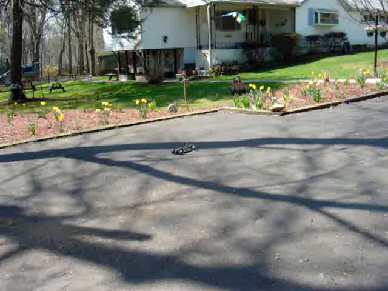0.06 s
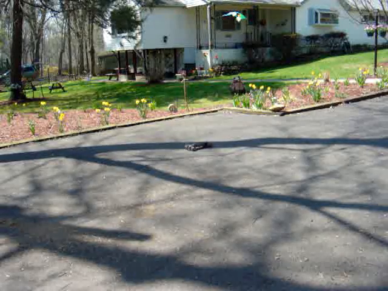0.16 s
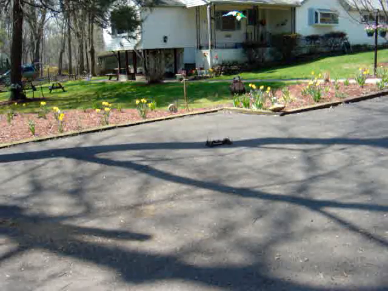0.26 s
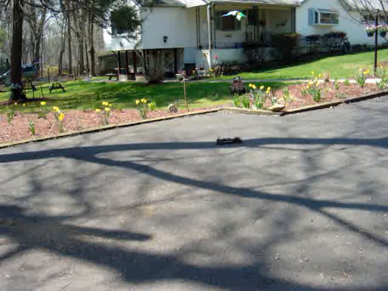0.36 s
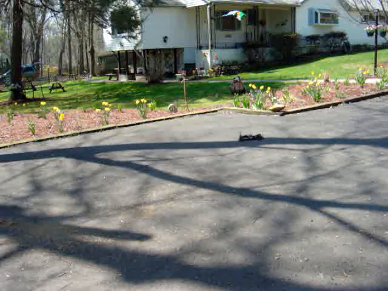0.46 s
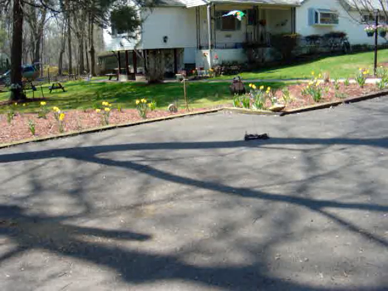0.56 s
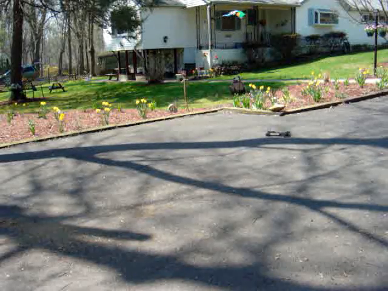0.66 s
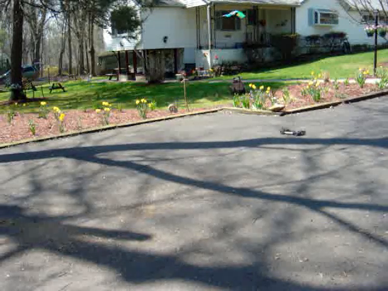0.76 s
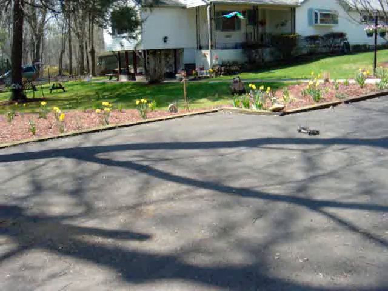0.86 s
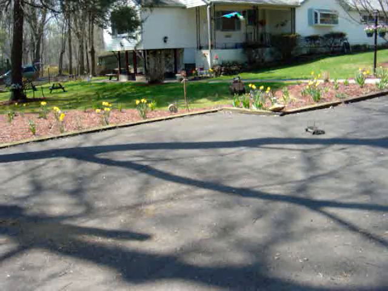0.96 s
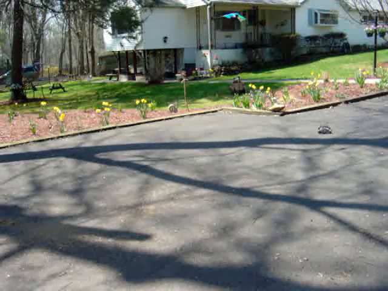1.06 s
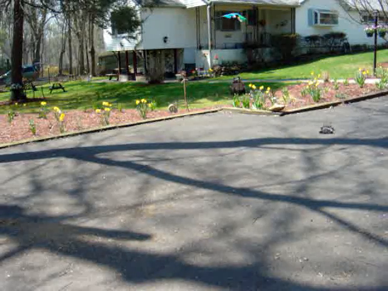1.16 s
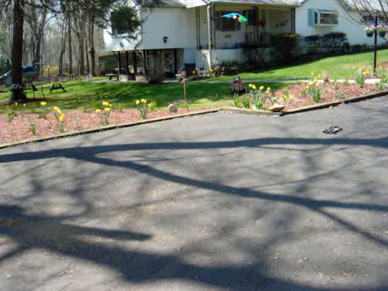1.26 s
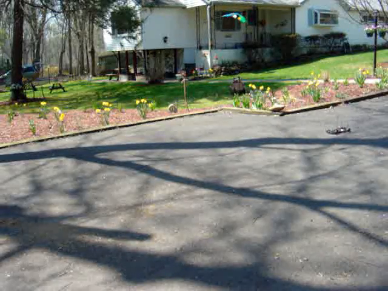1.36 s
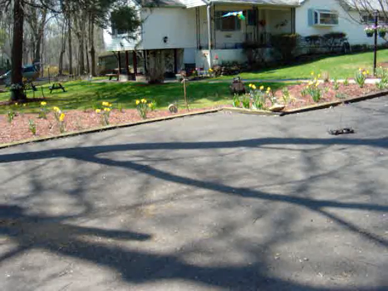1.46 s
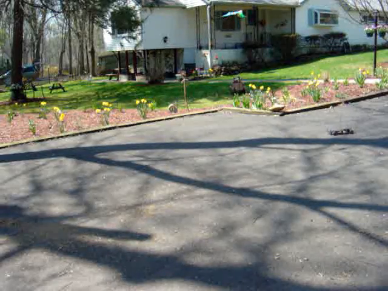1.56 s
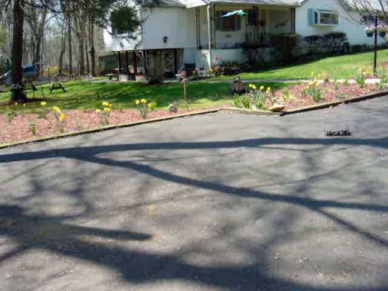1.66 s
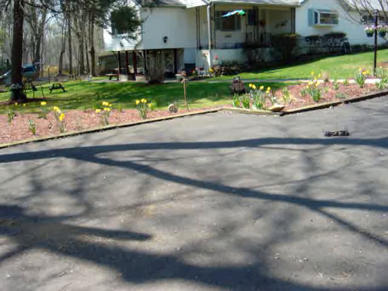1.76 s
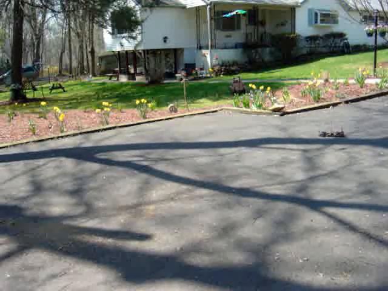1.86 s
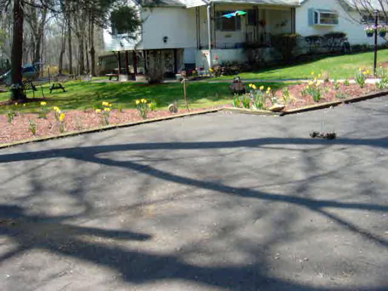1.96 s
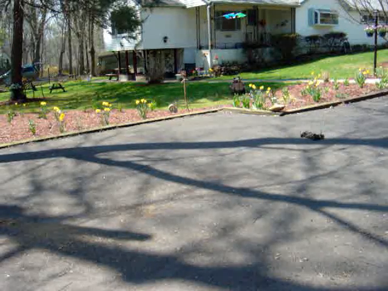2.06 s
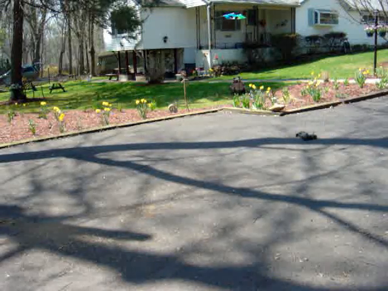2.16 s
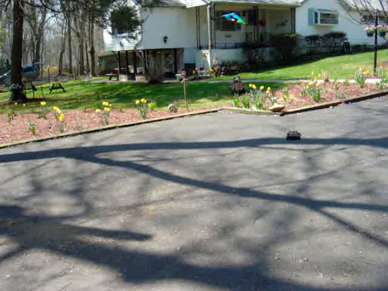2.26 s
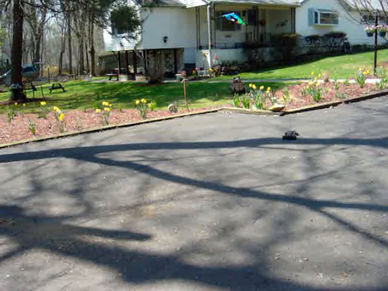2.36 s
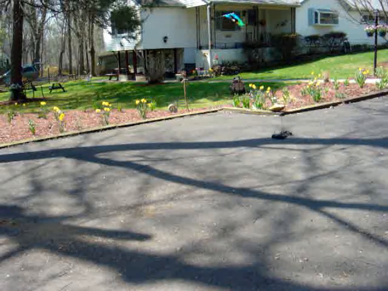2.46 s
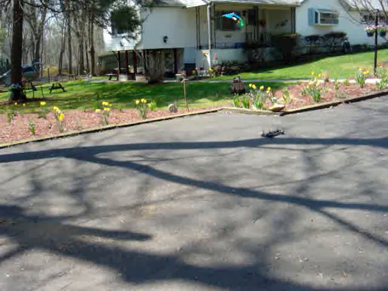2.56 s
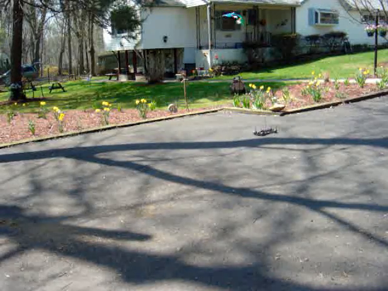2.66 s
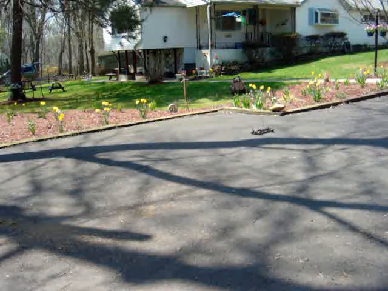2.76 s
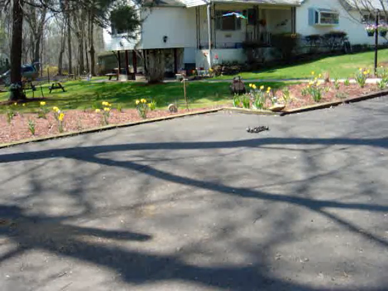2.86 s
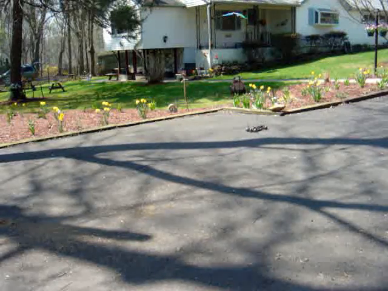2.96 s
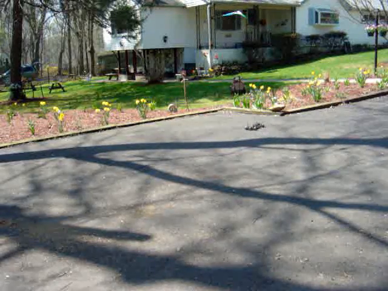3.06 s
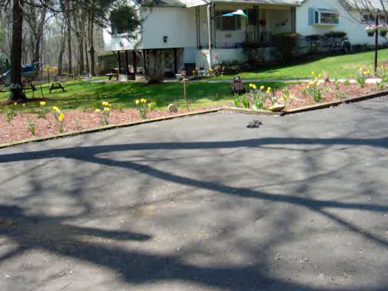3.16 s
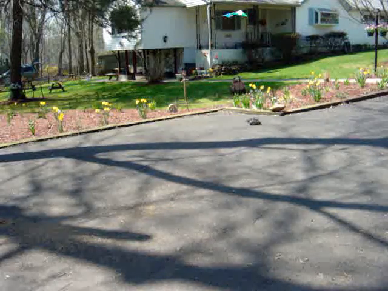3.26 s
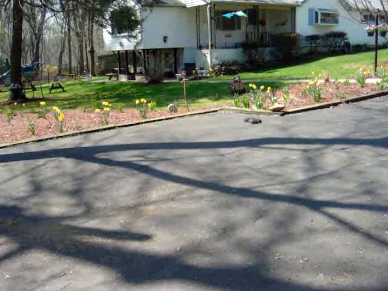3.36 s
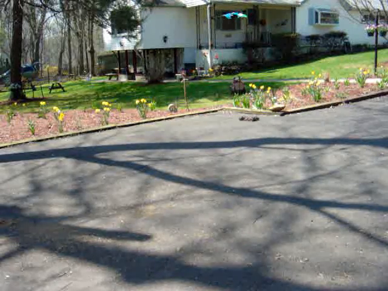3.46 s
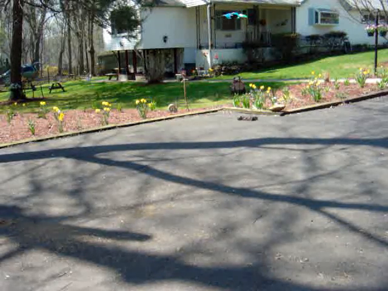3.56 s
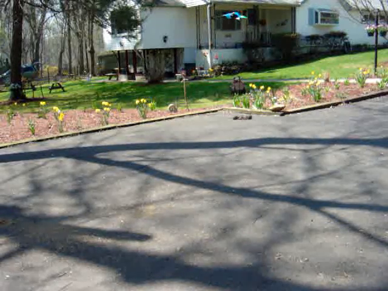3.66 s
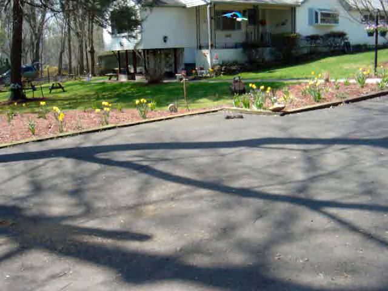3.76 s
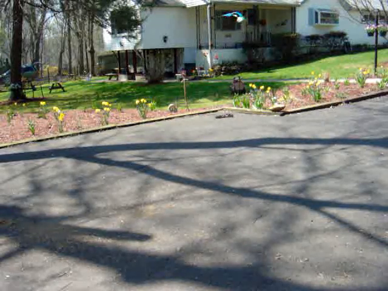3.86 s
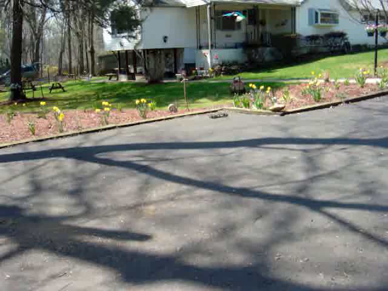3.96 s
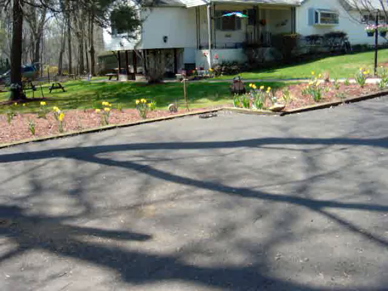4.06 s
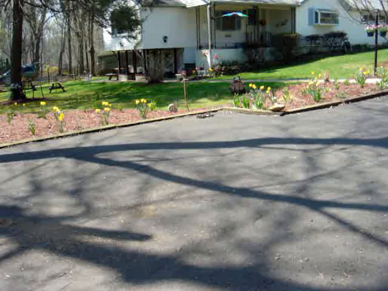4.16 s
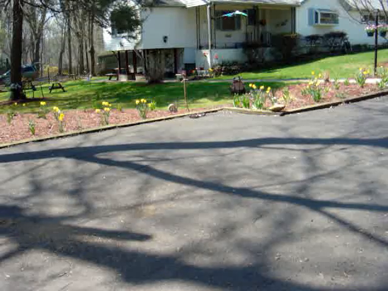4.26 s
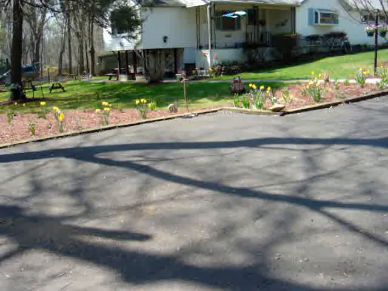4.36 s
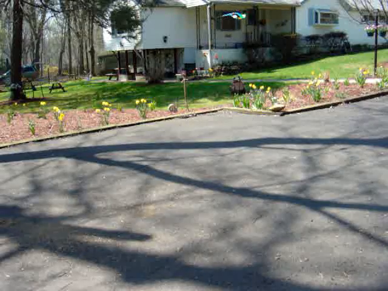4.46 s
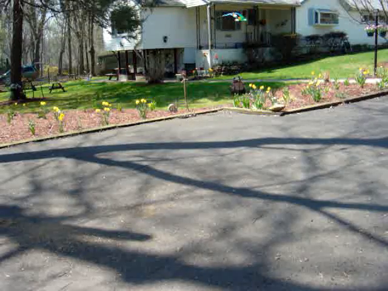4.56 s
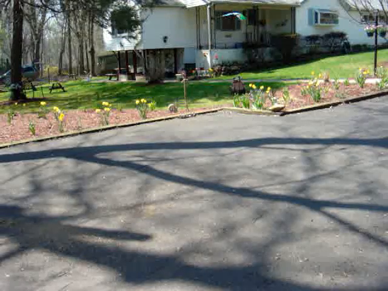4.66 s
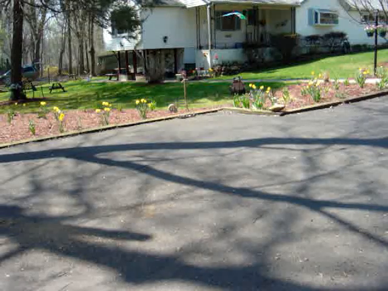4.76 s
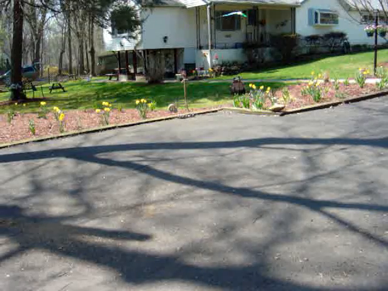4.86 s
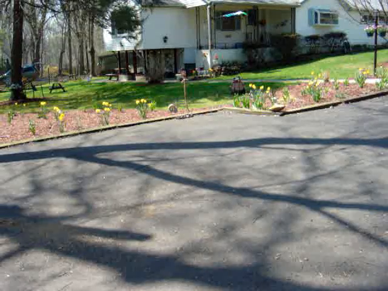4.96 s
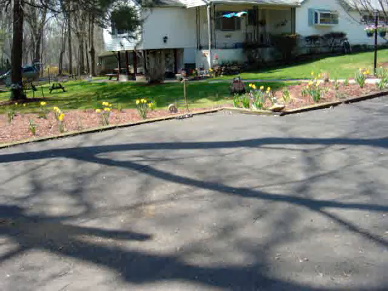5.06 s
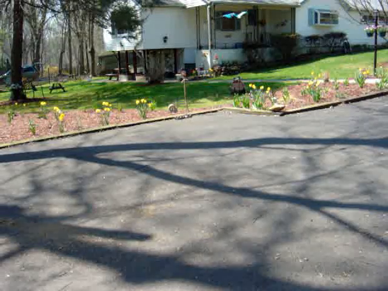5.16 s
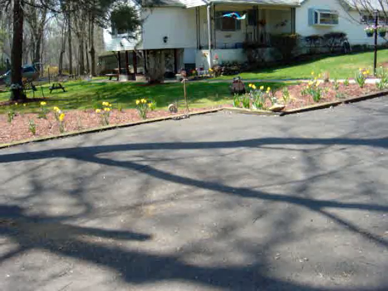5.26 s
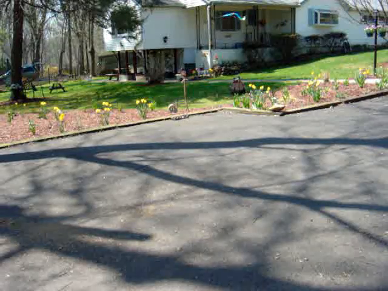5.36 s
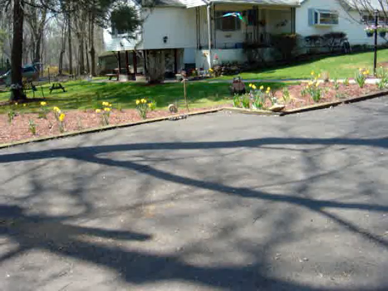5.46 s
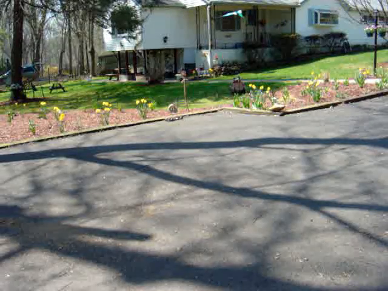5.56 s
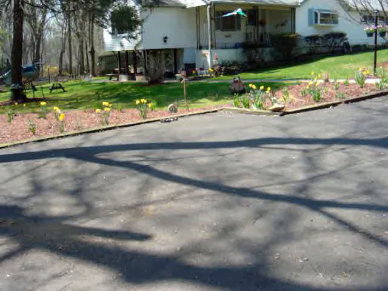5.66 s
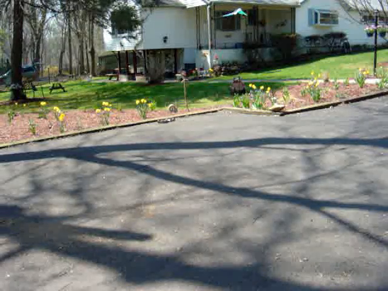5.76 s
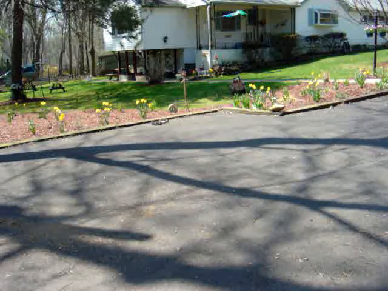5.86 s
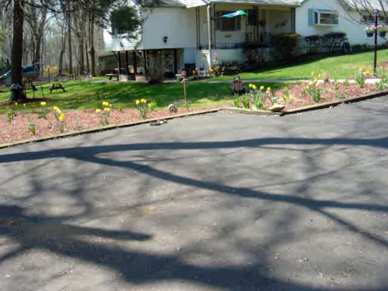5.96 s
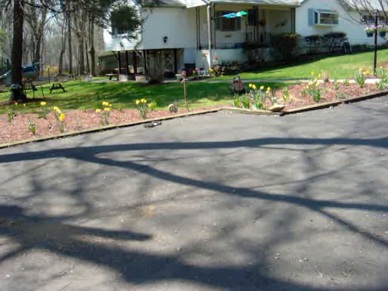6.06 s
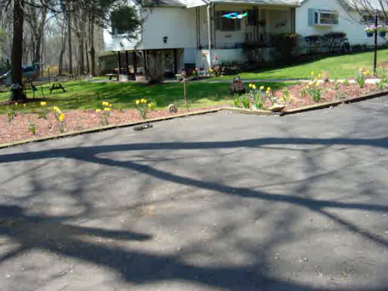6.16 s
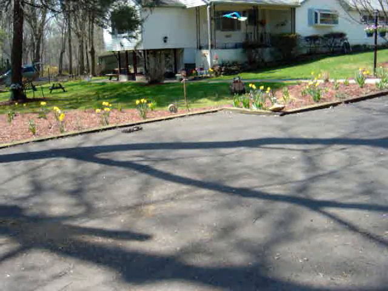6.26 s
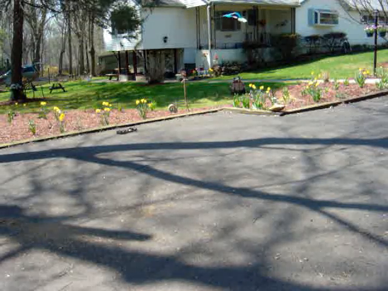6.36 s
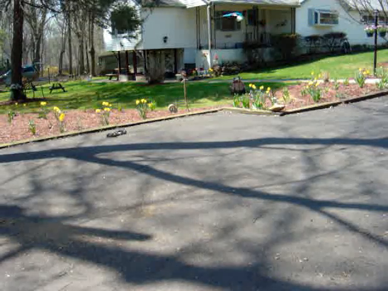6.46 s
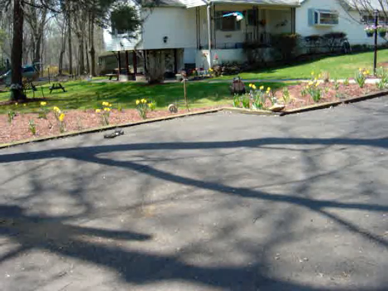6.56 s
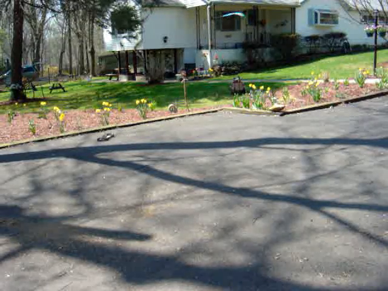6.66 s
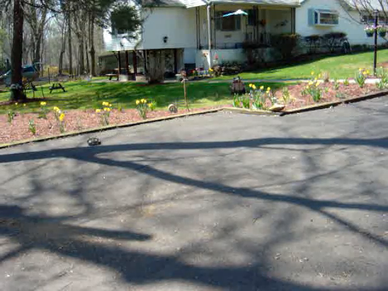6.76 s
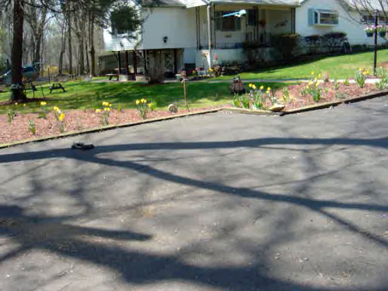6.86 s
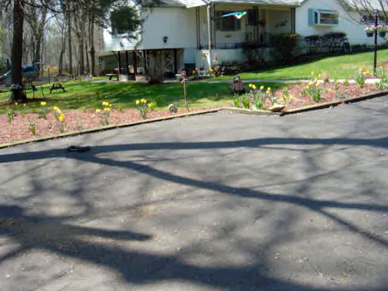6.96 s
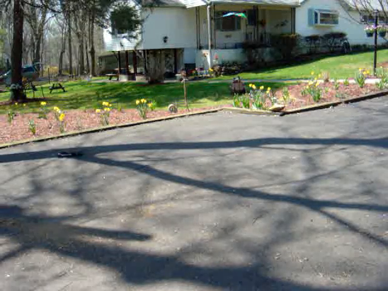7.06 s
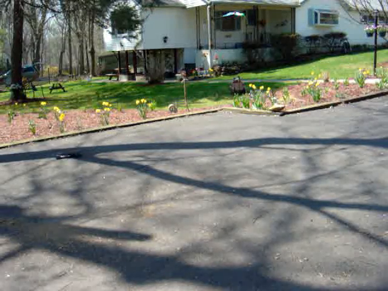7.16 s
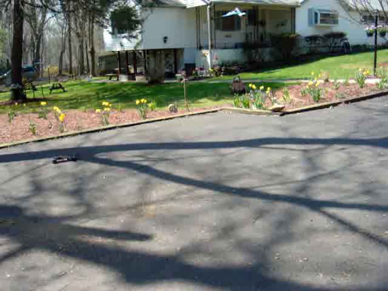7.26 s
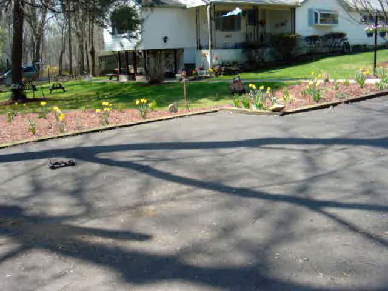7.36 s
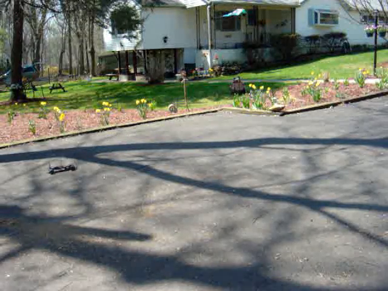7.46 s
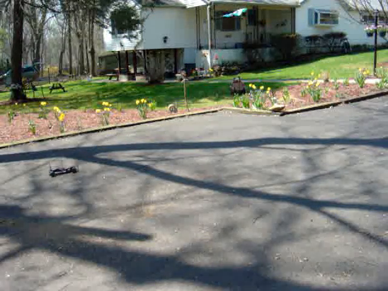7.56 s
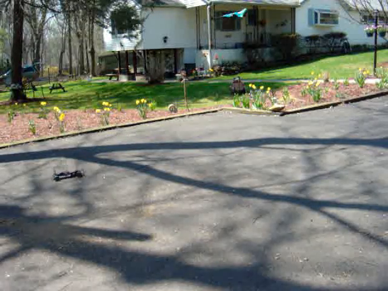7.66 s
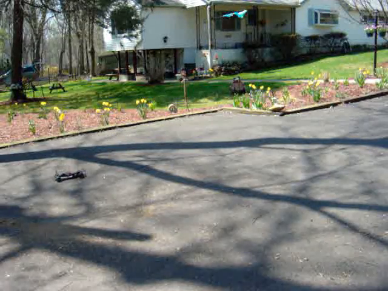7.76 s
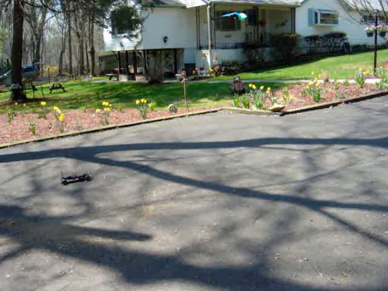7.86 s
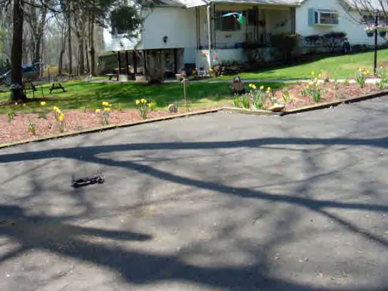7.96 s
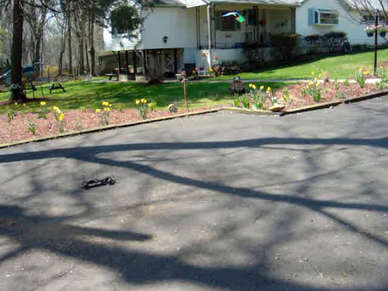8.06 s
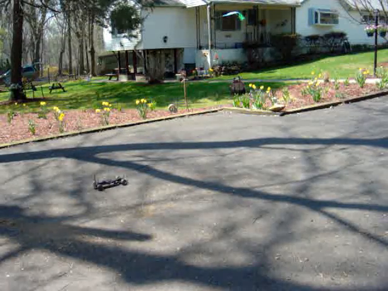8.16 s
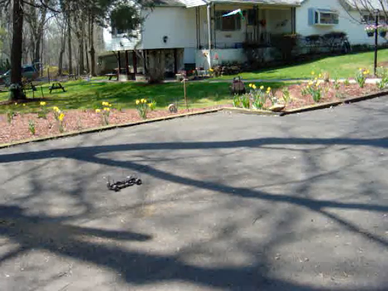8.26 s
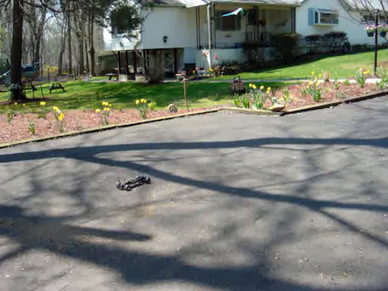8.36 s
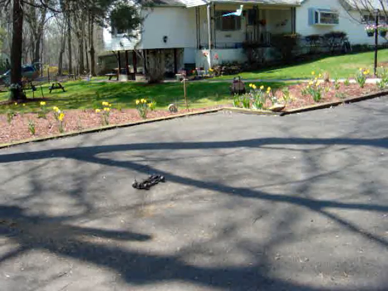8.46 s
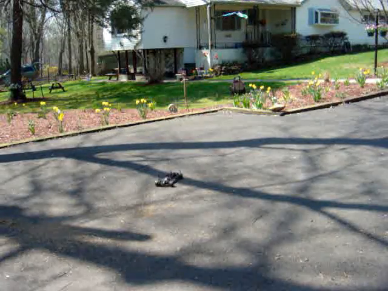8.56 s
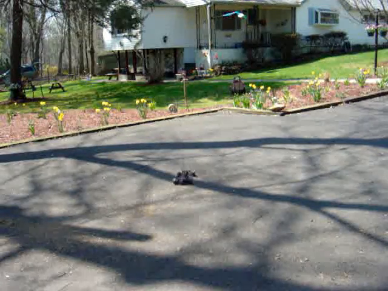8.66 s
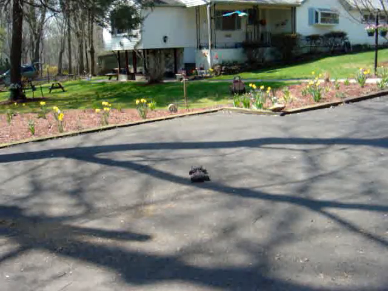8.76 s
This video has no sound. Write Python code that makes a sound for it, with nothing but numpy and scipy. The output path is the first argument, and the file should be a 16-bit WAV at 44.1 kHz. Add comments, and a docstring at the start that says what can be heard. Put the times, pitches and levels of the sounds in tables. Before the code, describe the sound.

A small electric remote-controlled car runs on an asphalt driveway throughout, with a high, raspy gear whine, a rattling chassis and the rumble and scrape of hard tyres. In the first three seconds the whine swoops quickly up and down with the throttle. Thin tyre squeals come around 0.5 to 1.2 seconds and again from 2.5 to 3.3, and sharp plastic clacks mark bumps near 0.9, 1.8 and 2.7 seconds. From about 3.5 seconds the car revs in short blips with more clacks, nearly stopping around 4.7 and 5.1, then runs low and quieter until 6.6. It surges near 6.8 seconds with a squeal, then holds a fast, high whine from 7.3 to the end near 8.8, the tyres squealing in a long slide. Irregular gusts thump the microphone over a low garden hush, and the car has a faint, short outdoor echo.

```python
"""Model car drifting on a driveway

A small electric model car slides round on asphalt. Its gears whine up and down with the throttle
and rattle the chassis. Its hard plastic tyres rumble, scrape and squeal, and bumps make it clack.
Gusts of wind thump the microphone over a quiet garden."""
import sys
import numpy as np
from scipy import signal
from scipy.fft import rfft, irfft
from scipy.io import wavfile
from scipy.ndimage import map_coordinates

SR = 44100
rng = np.random.default_rng(int(sys.argv[2]) if len(sys.argv) > 2 else 0)


def transcribe(u):
    """Save the signal u as a 16-bit wav file named by the first command-line argument.

    u: samples, shape (n,) or (channels, n), limited to [-1, 1]; the rate is SR.
    q: integer samples, one column per channel.
    """
    v = np.clip(np.atleast_2d(u).T, -1, 1)
    q = np.round(v * 32767).astype(np.int16)
    wavfile.write(sys.argv[1], SR, q)


N = 387638
TIME = np.arange(N) / SR
FREQS = np.fft.rfftfreq(N, 1 / SR)

# The motor's peaks and dips as the throttle is worked.
# Each row: time in seconds, tooth rate in Hz (how many gear teeth meet each second).
MOTOR_SPEEDS = [(0.0, 7550), (0.1, 8380), (0.386, 2242), (0.692, 5970), (0.825, 1867), (1.13, 954),
                (1.38, 5167), (1.54, 1643), (1.932, 6070), (2.239, 5160), (2.724, 3450), (3.059, 7250),
                (3.23, 1368), (3.299, 1455), (3.503, 5270), (3.644, 1405), (3.916, 6930), (4.071, 1388),
                (4.222, 3840), (4.37, 1354), (4.738, 470), (4.946, 4110), (5.065, 407.5), (5.225, 450),
                (5.49, 4910), (5.61, 941), (5.705, 880), (5.86, 1428), (5.919, 1459), (5.975, 2020),
                (6.019, 1705), (6.33, 1580), (6.613, 1710), (6.871, 7710), (7.042, 2525), (7.26, 4510),
                (7.531, 6440), (8.229, 6270), (8.374, 6780), (8.551, 4850), (8.71, 6950)]
# How loud the car would be at full speed as it circles and turns.
# Each row: time in seconds, then the levels of whine, rolling, rattle and scrape in dB.
CAR_LEVELS = [(0.0, -16, -26.5, -22.5, -19.5), (0.45, -19.5, -25.5, -22.5, -21),
              (0.8, -25, -24.5, -23.5, -18.5), (1.1, -27, -27.5, -20, -13),
              (1.55, -20.0, -31.5, -23.0, -20), (2.3, -20.5, -30.5, -22, -18.5),
              (3.05, -21.0, -29, -22.0, -18.5), (3.35, -28, -31.5, -22.5, -22),
              (3.9, -23.5, -31.5, -24.5, -22.5), (4.5, -28.5, -34, -23, -20.5),
              (4.9, -24, -33.5, -24.5, -20), (5.45, -24, -34.5, -24.5, -22.5),
              (5.75, -25.5, -33.5, -29.5, -30), (6.45, -27.5, -32, -25.5, -25), (6.8, -18, -28.5, -23, -22),
              (7.1, -21.5, -29.0, -22, -18.5), (7.6, -24.0, -26.5, -24.5, -17.5),
              (8.79, -17.5, -26.5, -22.5, -18.5)]
# The whine flares at pitches where the gearbox rings. Each row: frequency in Hz, gain in dB.
GEARBOX_TONE = [(500, -29), (900, -24), (1400, -20), (1900, -11), (2500, -8.5), (3200, 0.5), (3700, -2),
                (4200, -8), (5000, -11.5), (5900, -14.5), (6750, -4.5), (7400, -8.5), (8300, -17),
                (16000, -30)]
# The gears bite hard and the whine flares; one row is a dip instead.
# Each row: middle time in seconds, half length in seconds, level change in dB.
GEAR_BITES = [(0.289, 0.014, 6), (0.506, 0.015, 5.5), (1.26, 0.02, 3), (1.456, 0.017, 7),
              (2.158, 0.15, 2.5), (3.748, 0.014, 7), (3.89, 0.036, 7), (4.144, 0.012, 6), (5.36, 0.03, 4),
              (5.55, 0.014, 8), (5.976, 0.016, 8), (6.62, 0.013, -3), (7.12, 0.016, 10), (7.19, 0.04, 7)]
# The tone of the chassis, rolling tyres and scraping tyres. Each row: frequency in Hz, level in dB.
CHASSIS_TONE = [(900, -29), (1700, -11.5), (2200, -3.5), (2650, 2.5), (3100, 7.5), (3450, 0.5),
                (3900, -3.5), (4400, -4), (4900, -1.5), (5700, -4.5), (7500, -21.5), (12000, -20)]
ROLL_TONE = [(200, -7.5), (450, -6.5), (750, 1.5), (1150, 0), (1480, 2.5), (1900, 3), (2600, 5),
             (5000, -10)]
SCRAPE_TONE = [(1500, -21.5), (3500, -1.5), (5000, 1), (6500, 2), (7600, 4.5), (8500, 5), (9200, 2.5),
               (9700, 4.5), (12000, 3.5), (16000, -11.5)]
# Tyre squeals. Each row: start and end in seconds, pitch in Hz, spread of pitch in Hz, level in dB.
TYRE_SQUEALS = [(0.542, 0.771, 7130, 220, -36), (0.847, 0.988, 4890, 260, -28.5),
                (1.103, 1.198, 4810, 267, -34.5), (2.483, 2.753, 4840, 218, -31.5),
                (2.974, 3.129, 4850, 305, -32), (3.11, 3.344, 4845, 298, -31.5),
                (6.745, 6.957, 5000, 297, -27), (7.233, 8.274, 7410, 418, -30.5),
                (8.188, 8.79, 4680, 221, -32)]
# Knocks over bumps. Each row: time in seconds, clack level in dB, then the levels of bright grit
# and dull clunk in dB compared with the clack.
BUMPS = [(0.178, -22, -11, -24), (0.83, -15, -17, -17), (0.8733, -12.5, -8, -21), (1.1388, -16.5, -9, -16),
         (1.7537, -11.5, -18, -28), (1.815, -10, -20, -31), (2.6635, -15, 2, -24), (3.6341, -18, 2, -28),
         (3.7115, -27, -17, -26), (3.8195, -24, -14, 2), (4.1742, -15, -11, -28), (4.3485, -17, -6, -11),
         (4.407, -15.5, -4.5, -22), (4.645, -25, -20, -18), (5.22, -28, -5, -14), (6.6211, -20, -3, -4)]
# Thin whistles beside the whine. Each row: start and end in seconds, pitch in Hz, level in dB.
THIN_WHISTLES = [(1.2, 2.3, 1007, -45), (5, 5.21, 2406, -50), (-0.05, 0.18, 930, -40)]
# The car's echo off a hard surface nearby. Each row: time in seconds, echo delay in seconds.
ECHO_DELAYS = [(0, .00552), (.7, .00535), (1.2, .0051), (1.7, .005), (2.7, .00528), (4.7, .0056),
               (6.7, .00562), (8.2, .00546), (8.79, .0054)]
# Gusts at the microphone. Each row: start in seconds, length in seconds, level in dB.
WIND_GUSTS = [(0.153, 0.04, -33), (0.528, 0.088, -20.5), (0.818, 0.024, -25), (0.892, 0.022, -24),
              (1.199, 0.037, -36), (1.29, 0.18, -34), (1.345, 0.062, -27.5), (1.512, 0.15, -25.5),
              (1.775, 0.2, -23), (2.947, 0.036, -32.5), (3.578, 0.33, -34.5), (5.141, 0.097, -30.5),
              (5.321, 0.3, -31.5), (5.602, 0.12, -25.5), (5.781, 0.32, -24), (6.601, 0.051, -26),
              (6.708, 0.03, -24.5), (7.06, 0.031, -27), (7.17, 0.3, -29), (7.572, 0.12, -28.5),
              (7.841, 0.42, -36), (8.484, 0.12, -25.5), (8.61, 0.18, -33)]
# The tone of a hard gust, a light breeze and the garden. Each row: frequency in Hz, level in dB.
GUST_TONE = [(15, -50), (30, -24), (45, -11), (70, -6), (110, 2), (170, 2), (260, -4), (340, -11.5),
             (450, -13.5), (650, -36), (1200, -70)]
BREEZE_TONE = [(15, -45), (30, -18), (45, -9), (70, 0.5), (120, 2), (180, -7.5), (280, -11), (500, -26),
               (1200, -70)]
GARDEN_TONE = [(20, -8), (60, 0.5), (110, -4.5), (200, -3), (500, 0.5), (900, -7.5), (1400, -12),
               (2200, -40), (4000, -16), (8000, -70), (16000, -23)]


def motor_speed():
    """The tooth rate in Hz: the motor's inertia eases it from each peak or dip to the next."""
    times, hz = np.transpose(MOTOR_SPEEDS)
    rows = np.arange(len(times))
    place = np.interp(TIME, times, rows)
    eased = np.floor(place) + (1 - np.cos(np.pi * (place % 1))) / 2
    return np.interp(eased, rows, hz)


def spur_gear(tooth_hz, teeth=88):
    """A slightly uneven wave with one cycle for each turn of the big spur gear."""
    uneven_hz = tooth_hz * (1 + 0.0817 * wander(39))
    return np.sin(2 * np.pi * np.cumsum(uneven_hz) / teeth / SR)


def gear_whine(tooth_hz, load, level_db, spur, teeth_per_shake=9, clash_below_hz=1830):
    """Meeting teeth sing a raspy note; the slack between them shakes it, more so at speed."""
    teeth = np.cumsum(tooth_hz * (1 + .017 * wander(89.3))) / SR
    fray = np.clip(tooth_hz / 3800, .8, 1.6)
    shakes = rng.standard_normal((2, int(teeth[-1] / teeth_per_shake) + 2))
    along, across = (map_coordinates(shake, [teeth / teeth_per_shake], order=3, mode="nearest")
                     for shake in shakes)
    # a complex number lets the slack shake both the strength and the timing of the note
    slack = (1 + fray * (along + 1j * across)) / np.sqrt(1 + 2 * fray ** 2)
    # the gears tighten once a turn of the spur gear; the force jumps as the tyres catch and let go
    force = slack * unit((1 + .38 * spur) * flutter(hz=70, depth_db=2))
    force = force / np.hypot(1, abs(force) / 1.9)  # plastic teeth give way under the hardest blows
    note, octave, third_harmonic = (
        unit((force * np.exp(2j * np.pi * k * teeth)).real) * gain_at(GEARBOX_TONE, k * tooth_hz)
        for k in (1, 2, 3))
    # slow teeth with no load clash on both sides and sing their overtones
    slow = .5 + .5 * np.tanh((clash_below_hz - tooth_hz) / 250)
    clash = slow * (1 - abs(load)) * speed_gain(tooth_hz, knee_hz=1100, power=3.2)
    overtones = amp(-2) * octave + amp(-13) * third_harmonic
    return amp(level_db) * (note + amp(-20) * octave + clash * overtones)


def chassis_rattle(tooth_hz, level_db, spur):
    """Loose shafts and teeth chatter into the chassis and its thin shell."""
    chatter = grains(per_s=9000, spread_db=3) * (1 + 0.047 * spur) * flutter(hz=93.5, depth_db=2.5)
    return amp(level_db) * speed_gain(tooth_hz, knee_hz=1080, power=3.44) * colour(chatter, CHASSIS_TONE)


def tyre_roll(tooth_hz, level_db):
    """Hard tyres rumble over the stones."""
    rumble = colour(grains(per_s=4600, spread_db=2.0), ROLL_TONE)
    return amp(level_db) * speed_gain(tooth_hz, knee_hz=1030, power=1.0) * rumble


def tyre_scrape(tooth_hz, level_db):
    """Spinning tyres rasp; each patch of asphalt has its own tone, so each band of pitch flickers."""
    grit = rfft(colour(grains(per_s=14000, spread_db=4.5), SCRAPE_TONE))
    centres = np.linspace(0, SR / 2, num=14)
    bands = (irfft(grit * np.clip(1 - abs(FREQS - hz) / centres[1], 0, 1), N) for hz in centres)
    rasp = unit(sum(band * flutter(hz=73.4, depth_db=1.9) for band in bands))
    rasp *= flutter(hz=114, depth_db=2.5)
    slip = speed_gain(tooth_hz, knee_hz=6380, power=0.83)
    slip *= speed_gain(tooth_hz, knee_hz=640, power=3.4)  # at a crawl the tyres grip and hardly scrape
    return amp(level_db) * slip * rasp


def tyre_squeals():
    """A tyre sticks and slips, making a fuzzy ring around one pitch."""
    out = np.zeros(N)
    for start, end, hz, width, db in TYRE_SQUEALS:
        ring = irfft(rfft(rng.standard_normal(N)) / (1 + ((FREQS - hz) / width) ** 2), N)
        out += amp(db) * gate(start, end) * unit(ring)
    return out


def bump_knocks(rise_s=0.00086, decay_s=0.0073):
    """Each bump gives a short clack of plastic, a spit of grit and a clunk of the wheels."""
    clack, grit, clunk = (colour(rng.standard_normal(N), tone)
                          for tone in (CHASSIS_TONE, SCRAPE_TONE, ROLL_TONE))
    out = np.zeros(N)
    for start, db, grit_db, clunk_db in BUMPS:
        age = TIME - start
        blow = amp(db) * np.clip(age / rise_s, 0, 1) * np.exp(-abs(age) / decay_s)
        out += blow * (clack + amp(grit_db) * grit + amp(clunk_db) * clunk)
    return out


def whistles():
    """Faint, almost steady tones."""
    wavering_time = np.cumsum(1 + 0.0041 * wander(33)) / SR
    return sum(amp(db) * gate(start, end) * np.sqrt(2) * np.sin(2 * np.pi * hz * wavering_time)
               for start, end, hz, db in THIN_WHISTLES)


def near_echo(sound, strength=.3):
    """A quick echo lifts some pitches and weakens others; the pattern slides as the car moves."""
    delay, = curves(ECHO_DELAYS)
    echo = np.interp(TIME - delay, TIME, sound)
    return (sound + strength * echo) / np.hypot(1, strength)


def yard_echoes(sound, fade_s=.35, level_db=-17):
    """The house and trees scatter the sound into a faint, short tail."""
    t = np.arange(SR // 2) / SR
    echoes = rng.standard_normal(len(t)) * (rng.random(len(t)) < .05)
    tail = echoes * (t > .02) * amp(-60 * t / fade_s)
    return sound + amp(level_db) * signal.fftconvolve(sound, tail / np.linalg.norm(tail))[:N]


def wind(breeze_db=-42.5, hard_db=-33, rise_s=0.0081, fall_s=0.016):
    """Swirls of air thump the microphone: a breeze is a dull rumble, a hard gust is higher in pitch."""
    power = (amp(breeze_db) * flutter(hz=4, depth_db=2.5)) ** 2
    for start, length, db in WIND_GUSTS:
        before = np.maximum(start - TIME, 0)
        after = np.maximum(TIME - start - length, 0)
        power += (amp(db) * np.exp(-(before / rise_s) ** 2 - (after / fall_s) ** 2)) ** 2
    wind_db = 10 * np.log10(power)
    swirls = rng.standard_normal(N) * flutter(hz=52, depth_db=5.0)
    hard = .5 + .5 * np.tanh((wind_db - hard_db) / 6)
    return amp(wind_db) * ((1 - hard) * colour(swirls, BREEZE_TONE) + hard * colour(swirls, GUST_TONE))


def garden(level_db=-40.5):
    """The low, steady hush of the garden."""
    return amp(level_db) * colour(rng.standard_normal(N), GARDEN_TONE)


def amp(db):
    """Turns decibels into a gain, a number to multiply a sound by."""
    return 10 ** (np.asarray(db) / 20)


def unit(x):
    """Scales a signal to an average power of 1."""
    return x / np.sqrt(np.mean(x ** 2) + 1e-20)


def curves(rows):
    """Joins each column's values with straight lines; the first column gives the times."""
    times, *columns = np.transpose(rows)
    return [np.interp(TIME, times, column) for column in columns]


def gain_at(tone, hz):
    """Looks up a tone table's gain at the given frequencies."""
    table_hz, db = np.transpose(tone)
    return amp(np.interp(np.log(hz + 1), np.log(table_hz + 1), db))


def colour(x, tone):
    """Filters a sound with a tone table and scales it to a power of 1."""
    return unit(irfft(rfft(x) * gain_at(tone, FREQS), N))


def wander(hz):
    """A smooth random curve that wiggles up to about hz times a second."""
    return unit(irfft(rfft(rng.standard_normal(N)) / (1 + (FREQS / hz) ** 4), N))


def flutter(hz, depth_db):
    """A gain that swells and sinks at random."""
    return unit(amp(depth_db * np.clip(wander(hz), -2, 2)))


def grains(per_s, spread_db):
    """Tiny random hits, a few much larger than the rest."""
    size = amp(spread_db * np.minimum(rng.exponential(1, N), 5))
    return unit(size * rng.choice([-1, 1], N) * (rng.random(N) < per_s / SR))


def gate(start, end, fade_s=0.0099):
    """A gain that fades in at the start and out at the end."""
    return np.clip(np.minimum(TIME - start, end - TIME) / fade_s, 0, 1)


def speed_gain(tooth_hz, knee_hz, power):
    """A gain near 1 at high speed that dies away below knee_hz, more steeply for a higher power."""
    return (tooth_hz / np.hypot(tooth_hz, knee_hz)) ** power


def lagging(x, lag_s):
    """Follows x smoothly and a little late."""
    keep = np.exp(-1 / (lag_s * SR))
    return x[0] + signal.lfilter([1 - keep], [1, -keep], x - x[0])


def scene():
    """The motor drives the whine, rattle and tyre noise; echoes, wind and the garden surround the car."""
    tooth_hz = motor_speed()
    lagged_hz = lagging(tooth_hz, lag_s=0.0078)  # loose parts take a moment to follow the motor
    # speeding up (load towards 1) strains the gears and spins the tyres; coasting (towards -1) eases both
    full_load_hz_per_s = 17000
    load = np.tanh(np.gradient(tooth_hz) * SR / full_load_hz_per_s)
    whine_db, roll_db, rattle_db, scrape_db = curves(CAR_LEVELS)
    bite_db = sum(db * np.exp(-((TIME - middle) / half) ** 2) for middle, half, db in GEAR_BITES)
    spur = spur_gear(tooth_hz)
    bounce = flutter(hz=25.3, depth_db=0.9)  # the car bounces on the rough asphalt
    grip = flutter(hz=45, depth_db=3)  # the whine breaks up as the wheels hop and grip again
    car = grip * gear_whine(tooth_hz, load, whine_db + bite_db + 1.5 * load, spur)
    car += chassis_rattle(lagged_hz, rattle_db, spur)
    car += tyre_roll(lagged_hz, roll_db)
    car += tyre_scrape(lagged_hz, scrape_db + 0.24 * load)
    car += tyre_squeals()
    hush = garden()
    car = near_echo(bounce * car + bump_knocks()) + whistles()
    return (yard_echoes(car) + wind() + hush)[None]


def record(dry, step_hz=10020, step_db=-13, mirror_hz=12150, cutoff_hz=15830):
    """A small camera's sound: the top treble steps down, and the whine has a faint copy high above it."""
    spectrum = rfft(dry[0])
    treble_step = amp(step_db * np.clip((FREQS - step_hz) / 280 + .5, 0, 1))
    whine_band = irfft(spectrum / (1 + ((FREQS - 3100) / 1100) ** 4), N)
    shifted_up = (signal.hilbert(whine_band) * np.exp(2j * np.pi * mirror_hz * TIME)).real
    out = irfft(spectrum * treble_step, N) + amp(-17) * shifted_up
    lowpass = signal.firwin(511, cutoff_hz, window=("kaiser", 9), fs=SR)
    return signal.oaconvolve(out, lowpass, "same")[None]


dry = scene()
out = record(dry)
transcribe(out)
```